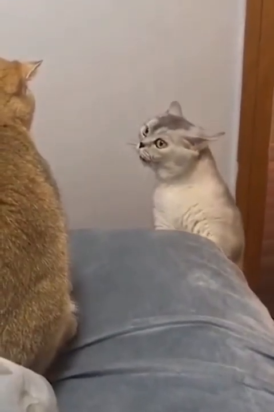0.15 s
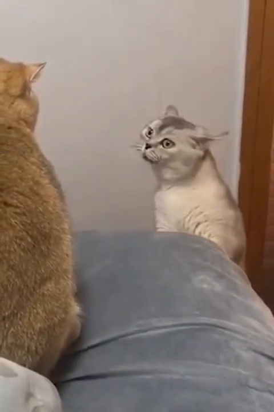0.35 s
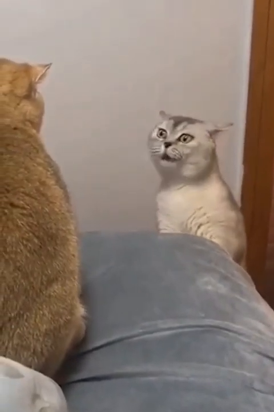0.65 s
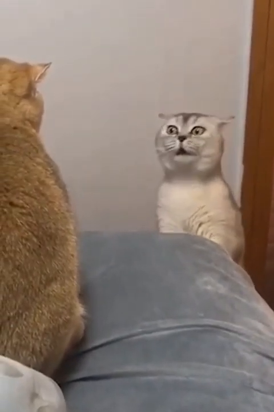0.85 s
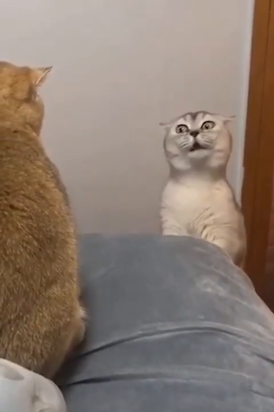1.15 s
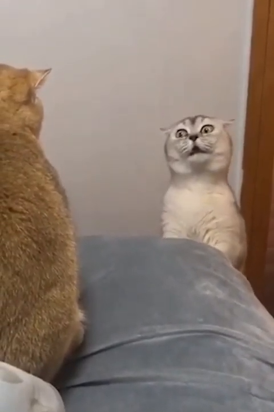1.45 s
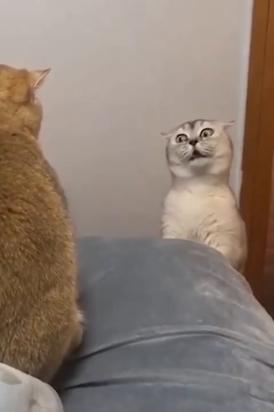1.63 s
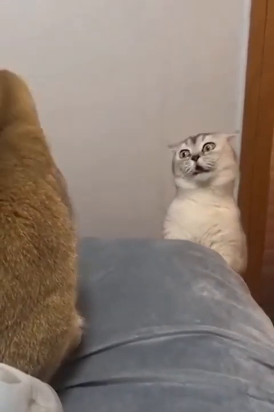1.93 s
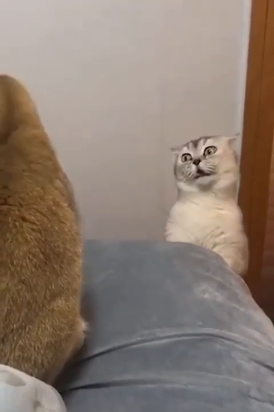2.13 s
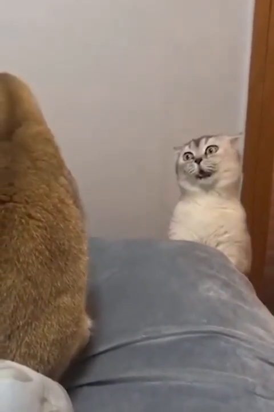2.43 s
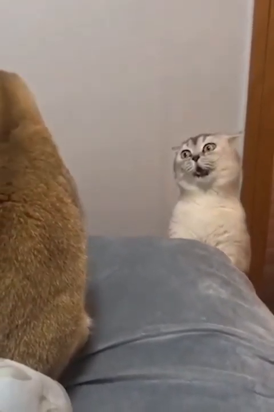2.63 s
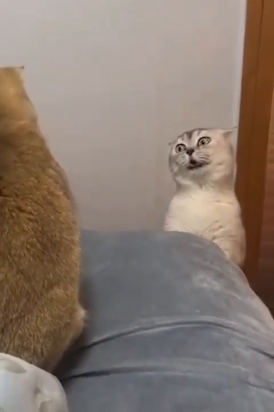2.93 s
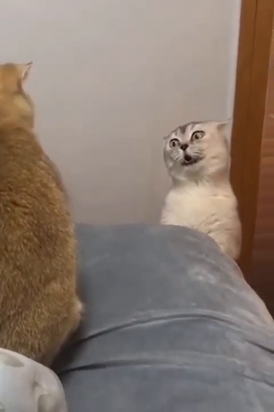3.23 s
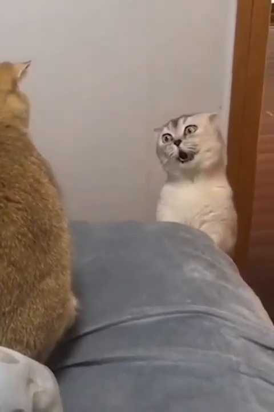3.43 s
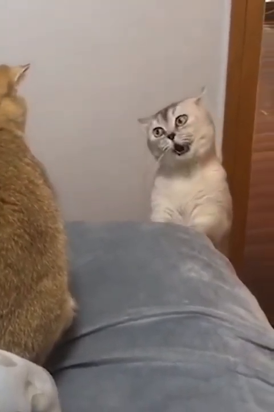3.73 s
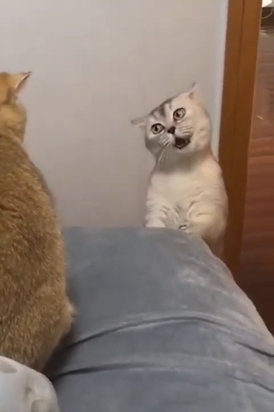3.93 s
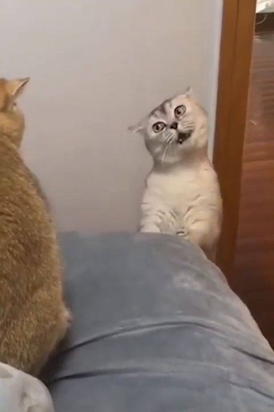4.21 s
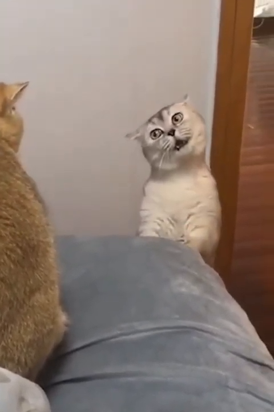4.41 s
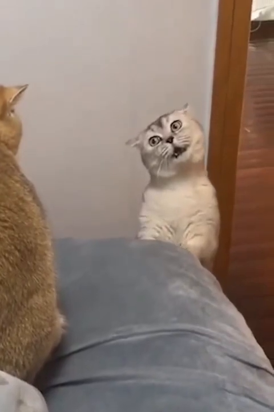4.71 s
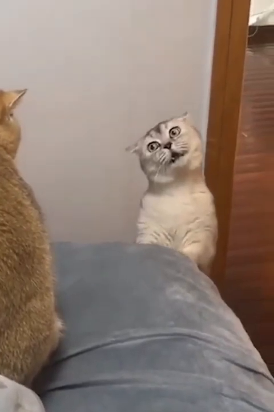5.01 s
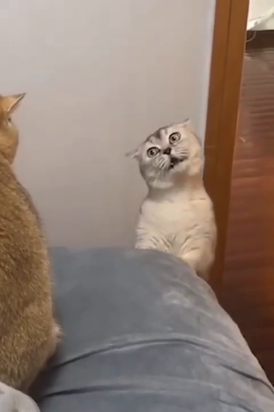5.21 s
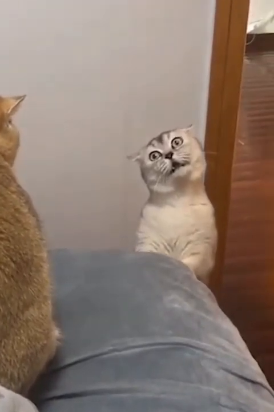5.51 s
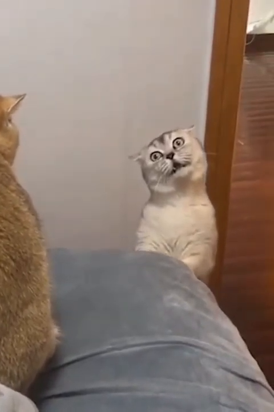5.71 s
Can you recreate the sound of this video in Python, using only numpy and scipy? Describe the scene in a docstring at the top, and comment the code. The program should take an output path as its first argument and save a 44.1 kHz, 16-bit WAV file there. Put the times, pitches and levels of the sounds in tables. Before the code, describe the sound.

In a small room with a faint rumble, one cat yowls twice at fairly close range. The first call is short and level in pitch. The second starts with a rough grunt, rises a little, grows louder and more open, and trails off in a strained rasp after about three seconds. Muffled bumps, light fabric rustling and small clicks are scattered around the calls and carry on briefly afterwards.

```python
"""A cat facing another cat in a small room gives two long yowls, the second swelling as its jaw opens wide.
Vocal-fold harmonics pass through moving jaw and tongue resonances; strain adds roughness and rasp.
A throaty grunt opens the second yowl. Soft bumps, cloth rustle and small ticks sound close by,
over short wall reverberation and a faint room rumble."""
import sys
import numpy as np
from scipy import signal
from scipy.fft import rfft, irfft, next_fast_len
from scipy.io import wavfile
from scipy.ndimage import uniform_filter1d

SR = 44100
rng = np.random.default_rng(int(sys.argv[2]) if len(sys.argv) > 2 else 0)


def bounce(signal):
    """Save signal as a 16-bit WAV file at the path given by the first command-line argument."""
    frames = np.transpose(np.atleast_2d(signal))
    limited = np.clip(frames, -1, 1)
    pcm = np.round(limited * 32767).astype(np.int16)
    wavfile.write(sys.argv[1], SR, pcm)


N = 258426
TIME_S = np.arange(N) / SR

# vocal-fold pitch: t/s, f/Hz
FIRST_PITCH = [(0.0, 321.7), (0.202, 308.4), (0.416, 318.4), (0.442, 322.9), (0.696, 328.4), (0.712, 331.4),
               (0.818, 337.3), (0.956, 332.5), (1.028, 345.7), (1.058, 338), (1.085, 310)]
SECOND_PITCH = [(2.28, 358), (2.3, 373), (2.32, 365), (2.36, 354.7), (2.4, 365.4), (2.42, 372.7),
                (2.6, 407.2), (2.62, 418.8), (2.73, 411), (2.93, 392.5), (2.96, 382.2), (3.11, 364.5),
                (3.23, 370.9), (3.48, 375.9), (3.5, 376.9), (3.71, 380), (3.99, 356.8), (4.3, 353.8),
                (4.74, 358.3), (4.87, 353), (4.89, 358.3), (5.15, 350.2), (5.22, 367.4), (5.29, 376)]
# effort and mouth: t/s, level/dB, jaw opening/0-1, lip opening/0-1, tongue f/Hz, tongue lift/dB
FIRST_MOUTH = [(0, -47, .22, 0.39, 2260, 19.5), (.2, -41.5, 0.25, 0.02, 2080, 11),
               (.42, -43, 0.15, 0.31, 2260, 6.5), (.58, -41, 0.12, 0.28, 2150, 10.5),
               (.75, -43.5, 0, 0.31, 2220, 17), (.95, -43.5, .07, 0.21, 1710, 14),
               (1.08, -53, 0.21, 0.18, 1990, 18.5)]
SECOND_MOUTH = [(2.29, -51, 0, 0.017, 1680, 11), (2.341, -42.5, 0.55, 0.18, 1950, 27),
                (2.42, -39, 0.57, 0.19, 2000, 19.5), (2.52, -39.5, 0.064, 0.11, 2450, 14),
                (2.72, -38.5, 0.14, 0.38, 2310, 14.5), (2.92, -39.5, 0.098, 0.51, 2640, 15),
                (3.12, -34, 0.55, 0.42, 2280, 13.5), (3.28, -35, 0.76, 0.7, 2666, 12.5),
                (3.68, -37, .92, 0.99, 2888, 31), (3.85, -35, .8, 0.73, 2800, 28.5),
                (4.02, -38.5, 0.5, 0.84, 2780, 12.5), (4.17, -39, 0.49, 0.75, 2610, 11),
                (4.299, -39, 0.58, 0.73, 2240, 7.5), (4.62, -37.5, 0.38, 0.6, 1860, 3.5),
                (5.0, -42, 0.0062, 0.66, 1945, 14.5), (5.14, -42.5, 0.07, 0.47, 1900, -2),
                (5.26, -45, 0, .2, 1953, -12)]
# jaw resonance, most of the call: t/s, level/dB before JAW_GAIN_DB
FIRST_JAW_RING = [(0.0, -29), (0.084, -31.5), (0.12, -36.5), (0.144, -29), (0.326, -30), (0.404, -26),
                  (0.744, -24), (0.766, -27.5), (0.992, -34), (1.016, -30), (1.076, -36), (1.085, -45)]
SECOND_JAW_RING = [(2.29, -49.5), (2.33, -26), (2.36, -40), (2.43, -23.5), (2.64, -41.5), (2.65, -38.5),
                   (2.78, -37), (2.85, -36), (2.88, -23), (2.94, -35), (2.97, -19.5), (2.99, -31),
                   (3.06, -22), (3.14, -25.5), (3.19, -24), (3.68, -16.5), (3.71, -19.5), (3.76, -14),
                   (3.81, -22), (3.84, -11), (3.99, -31.5), (4.0, -30), (4.88, -35.5), (4.9, -32),
                   (5.22, -44), (5.3, -48)]
# throat and nose colour: f/Hz, gain/dB
FIRST_THROAT = [(320, -6), (700, -0.5), (1100, -27), (1700, -9.5), (2700, -5.5), (3450, -20.5),
                (4400, -6.5), (5400, -31.5), (6450, -5.5), (7400, -21), (9300, -25.5), (12000, -33),
                (14300, -37.5)]
SECOND_THROAT = [(320, -9.5), (700, 5), (1100, -24.5), (1700, -10), (2700, -9), (3450, -20), (4400, -11),
                 (5400, -18.5), (6450, -6), (7400, -29), (8200, -23.5), (9300, -28.5), (12000, -32.5),
                 (14300, -38)]
# upper throat modes: f/Hz, width/Hz, lift/dB
THROAT_MODES = [(3523, 49, 4.5), (6620, 35, 3), (8000, 100, 4), (10140, 260, 6), (12080, 250, 8)]
# third resonance, tied to the tongue resonance: tongue f/Hz, f/Hz, lift/dB
THIRD_RESONANCE = [(1900, 4580, 2.5), (2230, 4460, 3), (2700, 4830, 7.5), (2780, 5030, 15.5)]
# side-cavity notch: lip opening/0-1, f/Hz, depth/dB
CAVITY_NOTCH = [(.15, 7220, 29), (.4, 6340, 10.5), (.65, 5985, 6)]
# independent swell of each harmonic: f/Hz, spread/dB
HARMONIC_SWELL = [(1200, .3), (2200, 2.4), (6000, 2.2)]
# vocal-fold strain: t/s, half length/s, added roughness/0-1, rasp/dB before RASP_COLOUR
STRAINS = [(1.06, 0.077, 0.18, 0), (2.28, 0.065, 0.38, 1), (2.533, 0.058, 0.2, -16),
           (2.777, 0.15, 0.05, -5.5), (4.15, .2, 0, -15), (4.95, 0.44, 0, -5), (5.22, 0.14, 0.18, -17)]
# rasp colour: f/Hz, gain/dB
RASP_COLOUR = [(300, -28), (1000, -29), (2100, -19), (2750, -5), (3400, -16), (4500, -2), (6300, -3),
               (8000, -8), (14000, -8)]
# grunt envelope: t/s, level/dB
GRUNT_LEVEL = [(2.14, -74), (2.153, -51.5), (2.21, -44.5), (2.25, -49.5), (2.31, -60), (2.34, -94)]
# grunt resonances: f/Hz, width/Hz, relative level/dB
GRUNT_MODES = [(477, 48, 2.5), (940, 360, 6.5), (1380, 280, -4), (1617, 47, -10)]
# padded contacts: t/s, level/dB, rise/s, fall/s, f/Hz
BUMPS = [(0.302, -38, 0.044, 0.035, 159), (.48, -50.5, 0.0061, 0.016, 178),
         (.891, -37.5, 0.047, 0.034, 175), (1.205, -43.5, .019, .021, 198),
         (1.296, -38.5, 0.01, 0.032, 146), (1.456, -40, 0.047, 0.028, 159), (2.12, -46, .032, 0.16, 137),
         (2.391, -42.5, 0.0084, 0.025, 153), (2.729, -45, 0.048, 0.044, 132),
         (2.939, -46.5, .035, 0.091, 175), (3.22, -55.5, 0.02, 0.9, 132), (3.779, -52.5, .015, 0.11, 146),
         (4.045, -49, .008, 0.042, 196), (4.474, -52, 0.018, 0.14, 200), (4.87, -55, .034, .069, 67.4),
         (5.22, -48.5, 0.027, .1, 185), (5.705, -41, .028, 0.031, 187.5), (5.759, -52, 0.036, 0.054, 74.6)]
# broad cloth strokes: t/s, level/dB, half length/s
RUSTLES = [(0.891, -49.5, 0.021), (1.207, -62, 0.099), (1.324, -73, 0.084), (1.457, -58, 0.09),
           (2.017, -63.5, 0.46), (2.272, -57, 0.028), (4.888, -50, 0.12), (5.415, -55, 0.04),
           (5.542, -58.5, 0.056), (5.703, -56.5, 0.059)]
# cloth spectrum: f/Hz, relative density/dB
CLOTH_COLOUR = [(200, 3), (500, -4), (1000, -6.5), (2000, -11.5), (4000, -16), (8000, -23), (13000, -27),
                (15000, -20)]
# narrow cloth strokes: t/s, level/dB, half length/s, f/Hz
SWISHES = [(1.325, -56, 0.066, 1500), (5.415, -65, 0.038, 2200), (5.517, -65.5, 0.034, 1880)]
# small clicks: t/s, level/dB, decay/s, f/Hz, width/Hz
TICKS = [(0.965, -44, 0.004, 5160, 450), (1.18, -45, 0.011, 1210, 1410), (1.197, -52, 0.0037, 1520, 2000),
         (4.889, -44.5, .006, 13150, 5050), (5.248, -43, 0.0021, 4340, 679)]
# reverberation re direct sound: f/Hz, gain/dB
REVERB_COLOUR = [(300, -18), (1100, -14), (2500, -8), (5000, -4)]
# room rumble spectrum: f/Hz, relative density/dB
RUMBLE_COLOUR = [(12, -45), (20, 7.5), (178, -3.5), (302, -12), (387, -22), (470, -18.5), (693, -21.5),
                 (914, -25), (1080, -21.5), (1680, -20), (7510, -34), (15000, -35)]

GLIDE_S, ONSET_S, RELEASE_S = .04, .008, .02
JAW_CLOSED_HZ, JAW_OPEN_HZ, JAW_GAIN_DB = 988, 1418.6, 3
JAW_WIDTH_HZ, TONGUE_WIDTH_HZ, THIRD_WIDTH_HZ, NOTCH_WIDTH_HZ = 106, 212, 200, 480
CLOSED_DB_PER_DECADE, OPEN_DB_PER_DECADE = -16.5, 7.5


def yowl(pitch_curve, mouth, ring_curve, throat, jitter=.007, shimmer=.88, harmonics=42):
    """Vocal-fold harmonics shaped by throat and mouth; strain shakes them and adds noise."""
    span = (TIME_S >= pitch_curve[0][0]) & (TIME_S <= pitch_curve[-1][0])
    t = TIME_S[span]
    pitch_hz = uniform_filter1d(curves_at(pitch_curve, t)[0], int(GLIDE_S * SR))
    voice_db, jaw, lips, tongue_hz, tongue_db = curves_at(mouth, t)
    ring_db, = curves_at(ring_curve, t)
    jaw_hz = JAW_CLOSED_HZ + (JAW_OPEN_HZ - JAW_CLOSED_HZ) * jaw
    rough, rasp = strain(t)
    # uneven cycles: all harmonics waver together
    phase = 2 * np.pi * np.cumsum(pitch_hz * (1 + jitter * rough * drift(56, t))) / SR
    strength = np.exp(shimmer * rough * drift(23, t))
    # harmonics nearest the jaw resonance share its level
    caught = np.sqrt(sum(bell(k * pitch_hz, jaw_hz, JAW_WIDTH_HZ) ** 4 for k in range(1, 7)))
    ring = from_db(ring_db + JAW_GAIN_DB) / caught
    voice = 0
    for k in range(1, harmonics + 1):
        hz, mean_hz = k * pitch_hz, k * np.mean(pitch_hz)
        swell_db = db_at(HARMONIC_SWELL, mean_hz) * drift(8, t)
        gain = from_db(voice_db + tract_db(hz, throat, lips, tongue_hz, tongue_db) + swell_db)
        gain += ring * bell(hz, jaw_hz, JAW_WIDTH_HZ) ** 2
        angle = k * phase + rng.uniform(0, np.pi)  # throat delay differs per harmonic
        skirt = rasp * from_db(db_at(RASP_COLOUR, mean_hz))  # turbulence round the harmonic
        flutter = 1 + rough * drift(31, t)
        in_phase = flutter + skirt * drift(110, t)
        quadrature = skirt * drift(110, t)
        voice += gain * (in_phase * np.cos(angle) + quadrature * np.sin(angle))
    fade = np.clip(np.minimum((t - t[0]) / ONSET_S, (t[-1] - t) / RELEASE_S), 0, 1)
    out = np.zeros(N)
    out[span] = voice * strength * fade
    return out


def tract_db(hz, throat, lips, tongue_hz, tongue_db):
    """Gain of throat, mouth and side cavity; parting lips brighten the voice."""
    throat_db = db_at(throat, hz) + sum(db * bell(hz, centre, width) for centre, width, db in THROAT_MODES)
    third_hz, third_db = curves_at(THIRD_RESONANCE, tongue_hz)
    mouth_db = tongue_db * bell(hz, tongue_hz, TONGUE_WIDTH_HZ)
    mouth_db += third_db * bell(hz, third_hz, THIRD_WIDTH_HZ)
    # the cavity absorbs one band and rings just below it
    notch_hz, depth_db = curves_at(CAVITY_NOTCH, lips)
    cavity_ring = .38 * bell(hz, .8 * notch_hz, NOTCH_WIDTH_HZ / 2)
    cavity_db = depth_db * (cavity_ring - bell(hz, notch_hz, NOTCH_WIDTH_HZ))
    db_per_decade = CLOSED_DB_PER_DECADE + (OPEN_DB_PER_DECADE - CLOSED_DB_PER_DECADE) * lips
    tilt_db = db_per_decade * np.clip(np.log10(hz / 700), 0, 1.1)
    return throat_db + mouth_db + cavity_db + tilt_db


def strain(t, calm_rough=.085, calm_rasp_db=-22):
    """Roughness and rasp gain, swelling where the folds strain."""
    rough, rasp = calm_rough, from_db(calm_rasp_db)
    for at_s, half_s, added_rough, db in STRAINS:
        swell = hump(t, at_s, half_s)
        rough += added_rough * swell
        rasp += from_db(db) * swell
    return rough, rasp


def grunt():
    """The folds rattle irregularly into a nearly closed mouth before finding their pitch."""
    level_db, = curves_at(GRUNT_LEVEL, TIME_S)
    rattle = sum(from_db(db) * resonant_noise(hz, width_hz) for hz, width_hz, db in GRUNT_MODES)
    span = (TIME_S > GRUNT_LEVEL[0][0]) & (TIME_S < GRUNT_LEVEL[-1][0])
    return from_db(level_db) * unit_rms(rattle) * span


def bumps(relative_width=.67):
    """Padded contacts, each swelling and dying in one dull, wide resonance."""
    out = 0
    for at_s, db, rise_s, fall_s, hz in BUMPS:
        age_s = TIME_S - at_s
        envelope = np.exp(-(np.minimum(age_s, 0) / rise_s) ** 2 - np.maximum(age_s, 0) / fall_s)
        out += from_db(db) * envelope * resonant_noise(hz, relative_width * hz)
    return out


def cloth(swish_width_hz=600):
    """Short strokes of rubbing cloth, mostly broad, a few narrow."""
    strokes = sum(from_db(db) * hump(TIME_S, at_s, half_s) for at_s, db, half_s in RUSTLES)
    out = strokes * unit_rms(coloured(rng.standard_normal(N), CLOTH_COLOUR))
    for at_s, db, half_s, hz in SWISHES:
        out += from_db(db) * hump(TIME_S, at_s, half_s) * resonant_noise(hz, swish_width_hz)
    return out


def ticks():
    """Tiny clicks dying within milliseconds."""
    out = 0
    for at_s, db, decay_s, hz, width_hz in TICKS:
        envelope = (TIME_S >= at_s) * np.exp(-np.abs(TIME_S - at_s) / decay_s)
        out += from_db(db) * envelope * resonant_noise(hz, width_hz)
    return out


def reverb(x, first_echo_s=.0076, low_t60_s=.53, high_t60_s=.24, split_hz=2400):
    """Dense wall reflections; soft furniture absorbs the lows, the treble dies first."""
    t = TIME_S[:SR // 2]
    tail = 0
    for band, t60_s in (("low", low_t60_s), ("high", high_t60_s)):
        echoes = rng.standard_normal(len(t)) * from_db(-60 * t / t60_s) * (t > first_echo_s)
        crossover = signal.butter(4, split_hz, band, fs=SR, output="sos")
        tail += signal.sosfilt(crossover, echoes / np.sqrt(np.sum(echoes ** 2)))
    return signal.fftconvolve(x, coloured(tail, REVERB_COLOUR))[:N]


def rumble(level_db=-61):
    """Steady low room noise."""
    return from_db(level_db) * unit_rms(coloured(rng.standard_normal(N), RUMBLE_COLOUR))


def from_db(db):
    """Decibels to gain."""
    return 10 ** (db / 20)


def unit_rms(x):
    """Scale to rms 1."""
    return x / np.sqrt(np.mean(x ** 2) + 1e-20)


def curves_at(rows, x):
    """Remaining columns, interpolated where the first equals x."""
    axis, *columns = np.transpose(rows)
    return [np.interp(x, axis, column) for column in columns]


def db_at(spectrum, hz):
    """Spectrum interpolated over log frequency."""
    points_hz, db = np.transpose(spectrum)
    return np.interp(np.log(np.maximum(hz, 1)), np.log(points_hz), db)


def coloured(x, spectrum):
    """Filter by a spectrum."""
    size = next_fast_len(len(x))
    gain = from_db(db_at(spectrum, np.fft.rfftfreq(size, 1 / SR)))
    return irfft(rfft(x, size) * gain, size)[:len(x)]


def bell(hz, centre_hz, width_hz):
    """Resonance shape: 1 at the centre, 1/2 at width_hz either side."""
    return 1 / (1 + ((hz - centre_hz) / width_hz) ** 2)


def hump(t, at_s, half_s):
    """Gaussian envelope, peak 1."""
    return np.exp(-((t - at_s) / half_s) ** 2)


def drift(rate_hz, t):
    """Smooth random wander, rms 1."""
    step_s = 20 / SR
    pole = np.exp(-2 * np.pi * rate_hz * step_s)
    noise = rng.standard_normal(len(t) // 20 + 1002)
    slow = signal.lfilter([1], [1, -2 * pole, pole * pole], noise)[1000:]  # skip settling
    return np.interp(t, t[0] + np.arange(len(slow)) * step_s, unit_rms(slow))


def resonant_noise(hz, width_hz):
    """Noise through two identical resonators in series, rms 1."""
    radius = np.exp(-np.pi * width_hz / SR)
    section = [1, 0, -1, 1, -2 * radius * np.cos(2 * np.pi * hz / SR), radius * radius]
    return unit_rms(signal.sosfilt([section] * 2, rng.standard_normal(N)))


def scene():
    """Cat and small noises in the room, over its rumble; mono."""
    cat = yowl(FIRST_PITCH, FIRST_MOUTH, FIRST_JAW_RING, FIRST_THROAT)
    cat += grunt()
    cat += yowl(SECOND_PITCH, SECOND_MOUTH, SECOND_JAW_RING, SECOND_THROAT)
    direct = cat + bumps() + cloth() + ticks()
    return (direct + rumble() + reverb(direct))[None]


def record(dry, cutoff_hz=14550):
    """Steep low-pass."""
    return signal.sosfilt(signal.ellip(10, .2, 80, cutoff_hz, fs=SR, output="sos"), dry)


dry = scene()
out = record(dry)
bounce(out)
```